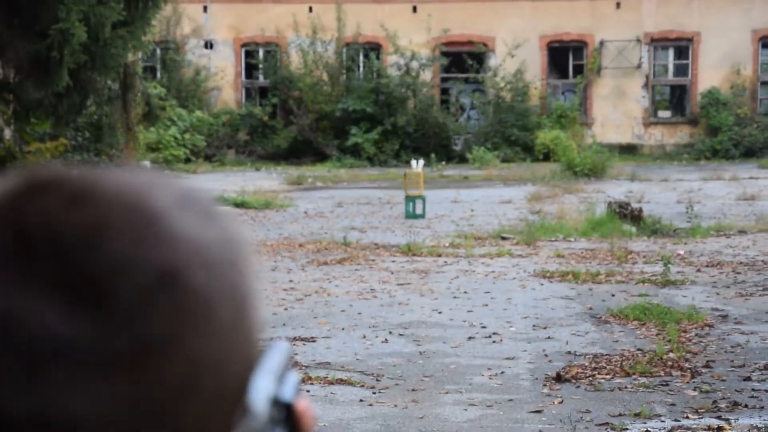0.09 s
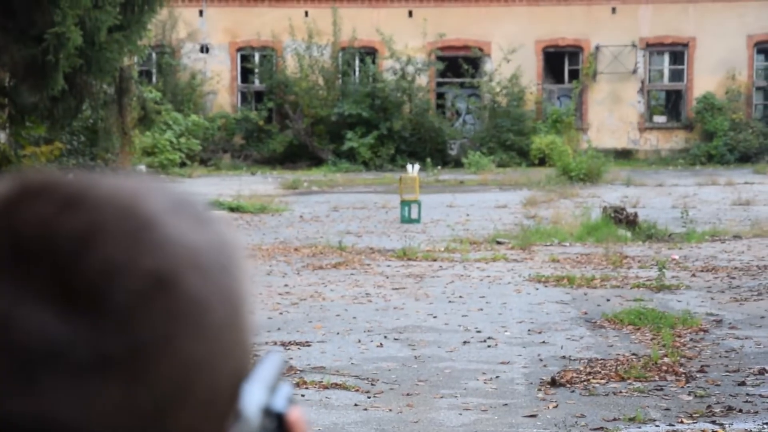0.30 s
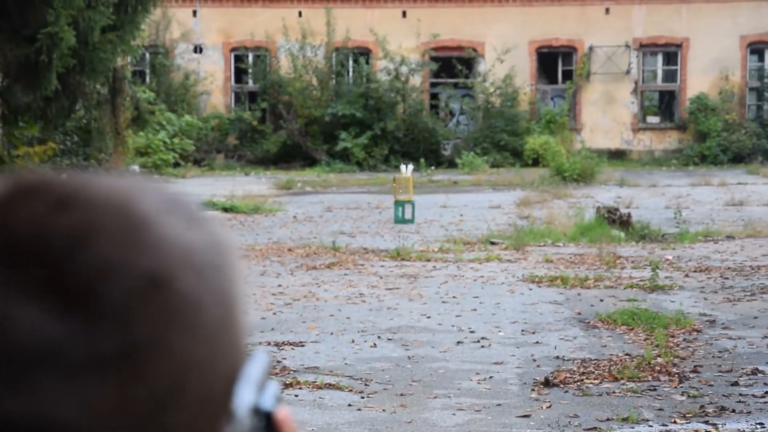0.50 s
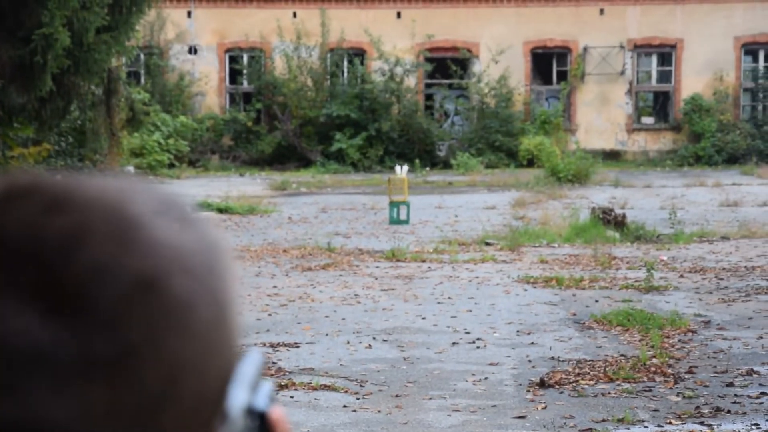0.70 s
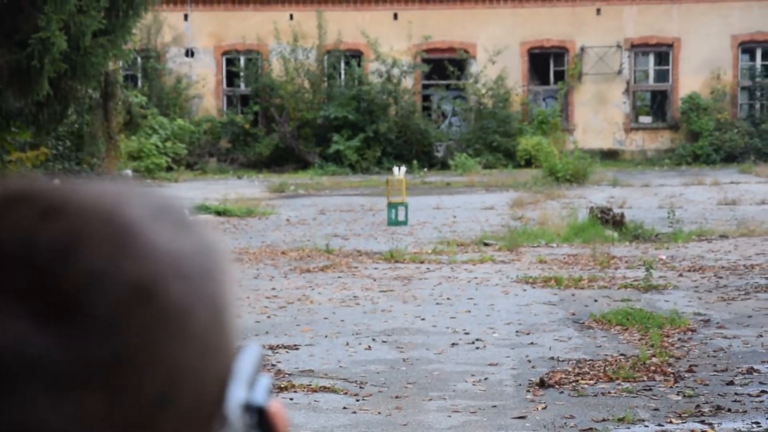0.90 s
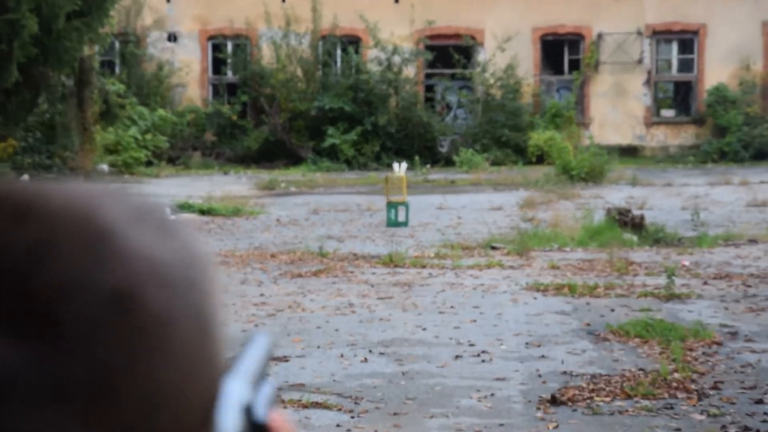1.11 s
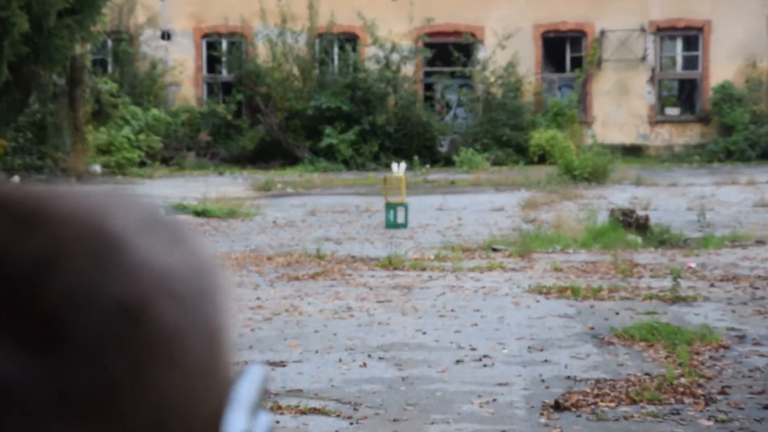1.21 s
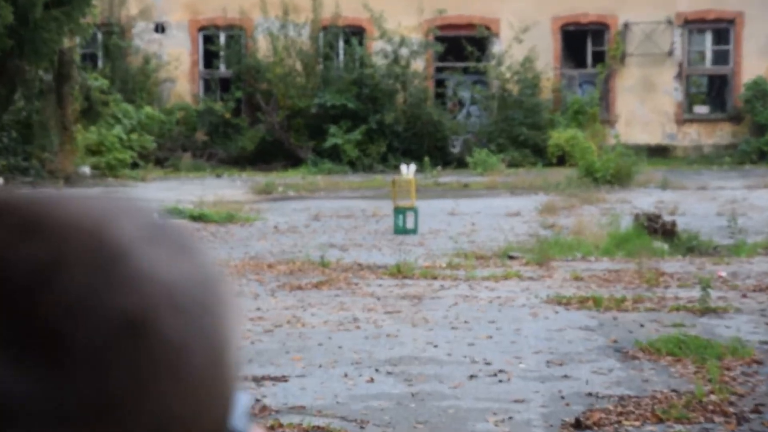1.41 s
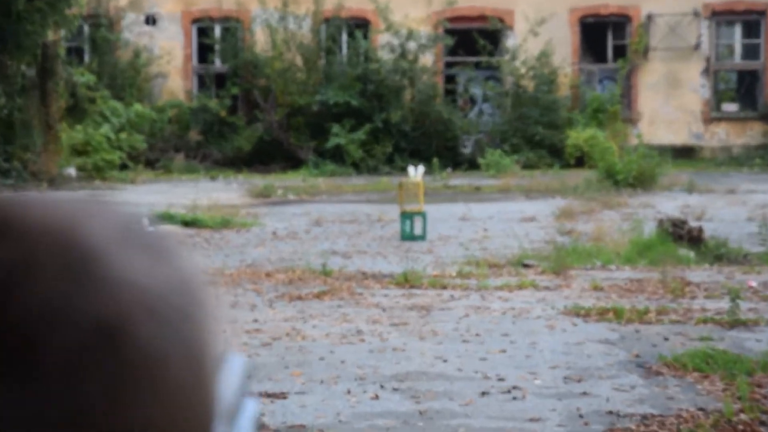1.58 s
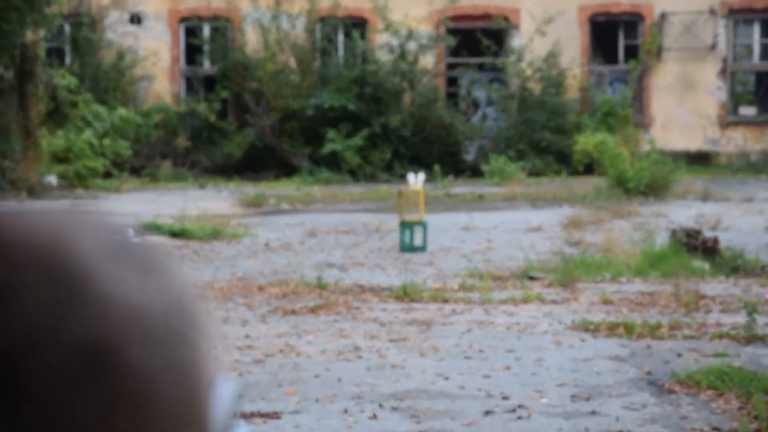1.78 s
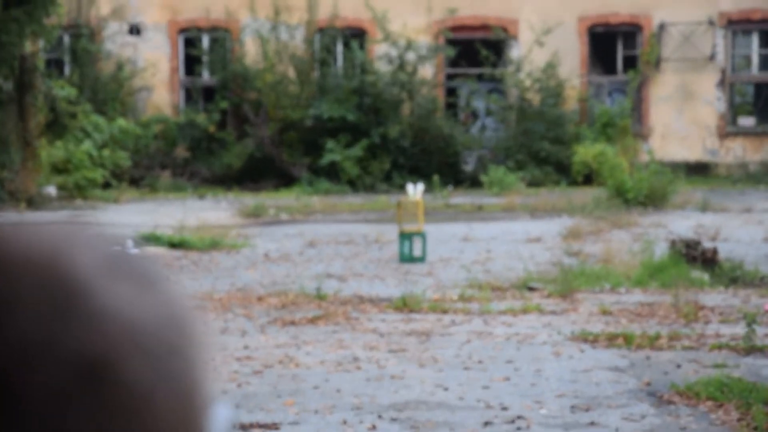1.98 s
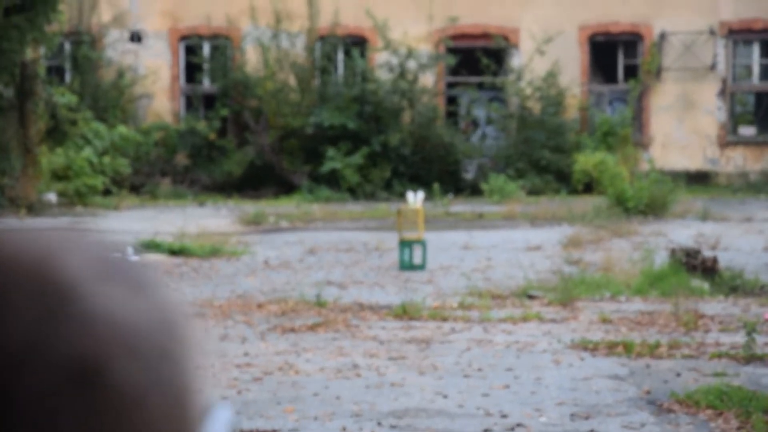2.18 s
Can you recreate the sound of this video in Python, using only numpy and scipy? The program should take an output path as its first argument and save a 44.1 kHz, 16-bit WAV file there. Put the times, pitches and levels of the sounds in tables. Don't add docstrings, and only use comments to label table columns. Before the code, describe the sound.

A spring-powered airsoft shotgun fires one sharp crack in a paved yard, then is pump-racked

```python
import sys
import numpy as np
from scipy import signal
from scipy.io import wavfile

SR = 44100
rng = np.random.default_rng(int(sys.argv[2]) if len(sys.argv) > 2 else 0)


def undo_db(level):
    steps = np.asarray(level, float) / 20
    return 10 ** steps


def output_pcm(signal):
    pcm = np.clip(np.atleast_2d(signal).T, -1, 1) * 32767
    wavfile.write(sys.argv[1], SR, np.round(pcm).astype(np.int16))


N = 97020

# frequency in Hz, level in dB.
HUSH_SPECTRUM = [(15, -40), (30, -19), (70, 2.5), (204, -5.5), (370, -7.5), (2430, -20), (3850, -30),
                 (4520, -23.5), (15600, -49.5)]
# frequency in Hz, level in dB.
HUM_TONES = [(200, -60), (300, -65.5)]
# frequency in Hz, width in Hz, level in dB, throb depth in dB.
INSECT_CHOIRS = [(4050, 1030, -60, 2), (3840, 250, -61.5, 6), (6400, 1400, -67, 3), (5440, 900, -67.5, 1.5)]
# frequency in Hz, level in dB per Hz.
EARLIER_SPECTRUM = [(200, 5), (500, 0), (900, 4), (1500, 0.5), (3000, -25), (8000, -37)]

# start in seconds, thump in dB, body in dB, metal in dB, dying time in seconds.
SHOT_CONTACTS = [
    (.1865, -12, -23.5, -24.5, 0.017),
    (.195, -11, -24, -17.5, 0.021),
    (.2027, -21, -14.5, -2.5, 0.0029),
    (.2057, 6, -1.5, 0.5, 0.0011),
    (.2095, -18, -6.5, -9, 0.0031),
    (.216, -11, -31, -20, 0.0093),
    (.229, -23, -20, -22.5, 0.018),
]
# frequency in Hz, width in Hz, level in dB.
THUMP_MODES = [(235, 30, -3), (375, 23, -16.5), (467, 120, -2.5), (660, 62, -5.5)]
# frequency in Hz, width in Hz, level in dB.
SHELL_MODES = [(860, 140, -1.5), (1177, 67, -1), (1447, 61, 0), (1625, 84, 0.5), (1940, 150, 0.5),
               (2446, 230, 1.5)]
# frequency in Hz, width in Hz, level in dB.
METAL_MODES = [(3080, 510, -4.5), (3750, 420, -2), (4190, 700, -1.5), (4970, 480, -4), (5445, 194, -2.5),
               (5700, 510, -2), (6260, 580, -1), (7080, 820, -2.5), (7670, 405, -4), (8370, 840, -8),
               (9380, 2700, -18), (12700, 2600, -48)]
# start in seconds, direction, frequency in Hz, width in Hz, level in dB.
BLAST_BLOWS = [
    (.2032, 1, 238, 45, 0),
    (.2043, 1, 540, 260, 1),
    (.2112, -1, 490, 190, 3),
    (.2028, 1, 1435, 70, -5),
    (.2028, 1, 1625, 60, -6),
    (.2046, 1, 650, 90, -9),
    (.2081, -1, 1435, 110, -9),
    (.2081, -1, 1625, 110, -10),
    (.2040, 1, 350, 90, -10),
]

# delay in seconds, level in dB, smear in seconds, dull above in Hz.
FACING_ECHOES = [
    (.098, -21, .004, 6000),
    (.100, -19, .035, 4500),
]
# delay in seconds, level in dB, smear in seconds, dull above in Hz.
WALL_ECHOES = [
    (0.148, -30.5, .015, 4030),
    (0.207, -37.5, .006, 3000),
    (.27, -34.5, .04, 400),
    (0.289, -37, 0.09, 3000),
    (0.435, -36.5, 0.12, 296),
    (.437, -33.5, 0.13, 3000),
]
# frequency in Hz, level in dB, 60 dB decay in seconds.
YARD_TAIL = [(101, -28, 0.19), (249, -20, 0.64), (550, -29.5, 0.89), (1030, -23.5, 0.98),
             (1640, -21.5, 1.55), (3000, -18, 1.05), (5900, -25.5, 0.86), (7940, -12, 0.55),
             (11900, -28, 0.56)]
# start in seconds, frequency in Hz, width in Hz, level in dB.
BOOM_RETURNS = [
    (.235, 244, 4.0, -23),
    (.40, 256, 9, -33),
    (.475, 240, 7, -33),
    (.51, 250, 12, -35),
    (.635, 237, 6, -33),
    (.665, 237, 9, -34),
]

# start in seconds, frequency in Hz, width in Hz, level in dB.
TAP_BLOWS = [(0.8634, 1060, 200, -31.5), (.921, 820, 196, -24), (0.9207, 4150, 260, -12.5),
             (.9212, 5840, 348, -15.5), (0.9215, 3710, 250, -15.5), (0.942, 7000, 900, -46),
             (0.9896, 6800, 500, -19), (0.9966, 5740, 300, -26), (1.0382, 6500, 300, -18),
             (1.0445, 6800, 400, -21), (1.282, 7000, 400, -29), (1.305, 7200, 298, -30),
             (1.307, 2280, 200, -30), (1.3314, 2450, 300, -19), (1.3315, 3450, 400, -16),
             (0.9768, 4560, 300, -22), (0.9896, 810, 200, -20), (1.0133, 6250, 120, -19),
             (1.0185, 763, 152, -16), (1.037, 365, 60, -35), (1.0375, 780, 103, -24),
             (1.0392, 1620, 204, -10.5), (1.048, 4850, 300, -18), (1.2806, 1720, 199, -24),
             (1.2905, 715, 152, -29), (1.3315, 870, 300, -26), (1.3305, 1500, 300, -27),
             (1.363, 1190, 121, -16.5), (1.3645, 1570, 202, -10), (1.366, 260, 79, -21.5),
             (1.367, 755, 120, -19), (1.375, 6400, 200, -22), (1.7339, 400, 120, -30),
             (1.7482, 2780, 250, -37), (1.7475, 3770, 500, -34.5), (1.748, 131, 60, -28),
             (1.7495, 670, 122, -36.5)]
# start in seconds, thump, body and metal in dB, dying time in seconds.
PUMP_CONTACTS = [(.864, -38, -41.5, -48, 0.0082), (.941, -58, -32.5, -61, 0.0077),
                 (.958, -48, -33, -48, 0.011), (.9755, -53, -24, -23, 0.002),
                 (.982, -54, -25.5, -34, 0.0096), (.989, -43, -20.5, -17, 0.0042),
                 (.995, -52, -33.5, -31.5, 0.017), (1.009, -59, -25, -24.5, 0.011),
                 (1.018, -34, -23, -24.5, 0.0094), (1.035, -21, -14.5, -17, 0.0031),
                 (1.0378, -16, -18, -15, 0.0045), (1.0435, -33, -31.5, -29, 0.029)]
# start in seconds, thump, body and metal in dB, dying time in seconds.
PUSH_CONTACTS = [(1.192, -39.5, -34, -40, 0.014), (1.247, -61, -46, -64, 0.0036),
                 (1.2799, -53, -39.5, -31, 0.011), (1.29, -61, -30.5, -36, 0.0068),
                 (1.302, -43, -31.5, -30, 0.021), (1.3314, -41, -15.5, -20, 0.0014),
                 (1.338, -42, -30.5, -35.5, 0.021), (1.3575, -45, -26.5, -23.5, 0.0085),
                 (1.365, -17, -12, -17, 0.0021), (1.3680, -44, -14, -12, 0.0055),
                 (1.374, -32.5, -31.5, -32, 0.034), (1.732, -42, -45, -62, 0.009),
                 (1.749, -39, -36, -73, 0.004)]
# frequency in Hz, width in Hz, level in dB.
KNOCK_MODES = [(155, 89, -6), (228, 86, -5.5), (394, 110, -0.5)]
# frequency in Hz, width in Hz, level in dB.
BODY_MODES = [(583, 89, -3), (705, 215, 1.5), (900, 175, 1.5), (1097, 205, -0.5), (1500, 266, 2),
              (1840, 390, 0), (2250, 470, 0), (2780, 180, -3)]
# start in seconds, thump, body and metal in dB, dying time in seconds.
CATCH_CONTACTS = [
    (.918, -23, -37, -37, 0.0025),
    (.9211, -19, -20.5, -17, 0.0014),
    (.925, -35, -30, -26, 0.0018),
    (1.7472, -63, -37, -37.5, 0.0011),
]
# frequency in Hz, width in Hz, level in dB.
LATCH_MODES = [(2670, 300, -20), (3270, 230, -5), (3710, 220, -0.5), (4150, 240, 5), (5090, 300, -7),
               (5840, 350, -6), (7450, 900, -8)]
# start in seconds, thump, body and metal in dB, dying time in seconds.
TRIGGER_CONTACTS = [
    (2.1797, -63, -60, -31, 0.0054),
    (2.186, -63, -54, -44, 0.0079),
    (2.192, -50, -47.5, -35.5, 0.012),
    (2.198, -57, -45, -28, 0.005),
]
# frequency in Hz, width in Hz, level in dB.
TRIGGER_MODES = [(3000, 240, -25), (3670, 280, 6.5), (3980, 180, 5), (5300, 350, -4.5), (6300, 500, -7),
                 (7200, 410, -7.5), (8440, 710, -15), (10900, 2800, -24)]

HUSH_DB, WHINE_HZ, WHINE_DB, THROBS_PER_S = -54, 15720, -75, 50
EARLIER_DB, EARLIER_T60_S = -51.5, 12.2
SPRING_HZ, SPRING_BEFORE_DB, SPRING_DB = 560, -54.5, -42.5
SPRING_T60_S, SPRING_GRIPPED_S = 3.24, 1
CHATTER_PER_S, CHATTER_SPREAD_DB, MODE_SPREAD_DB = 7000, 4.0, 2.0
FIRST_TOUCH, RISE_SHARE = 2.0, 0.3
BLAST_DB = 0
YARD_LUMPS_DB, YARD_RISE_S = 2.0, 0.0059
FACING_LOW_HZ, WALL_LOW_HZ = 480, 20
LATCH_CUT_HZ, GUN_LOW_CUT_HZ = 16000, 150
CATCH_TO_YARD = 0.4
MIC_HISS_DB, CLIP_TOP, CLIP_HARD = -74, 0.97, 6


def rms_one(x):
    return x / np.sqrt(np.mean(x ** 2) + 1e-20)


def drift(rate_hz):
    r = np.exp(-2 * np.pi * rate_hz / SR)
    slow = signal.lfilter([1], [1, -2 * r, r * r], rng.standard_normal(N + SR))
    return rms_one(slow[SR:])


def resonate(x, hz, width_hz):
    r = np.exp(-np.pi * width_hz / SR)
    w = 2 * np.pi * hz / SR
    return signal.lfilter([0, np.sin(w)], [1, -2 * r * np.cos(w), r * r], x + 1e-18)


def bands():
    edges = 24 * 2 ** np.arange(0, 9.6, 0.5)
    white = rng.standard_normal((2, N))
    for k, (low, high) in enumerate(zip(edges, edges[1:])):
        band = signal.butter(2, [low, high], "band", fs=SR, output="sos")
        yield np.sqrt(low * high), signal.sosfilt(band, white[k % 2])


def at_hz(points, hz, axis=1):
    table = np.array(points)
    return np.interp(np.log(hz), np.log(table[:, 0]), table[:, axis])


def throb():
    rate_hz = THROBS_PER_S * (1 + 0.239 * drift(6.44))
    return np.sin(2 * np.pi * np.cumsum(rate_hz) / SR)


def insects():
    out = np.zeros(N)
    for hz, width_hz, db, depth_db in INSECT_CHOIRS:
        level = undo_db(db + depth_db * throb())
        song = resonate(resonate(rng.standard_normal(N), hz, width_hz), hz, width_hz)
        out += level * rms_one(song)
    return out


def background():
    t = np.arange(N) / SR
    hush = sum(b * undo_db(at_hz(HUSH_SPECTRUM, hz) + 0.5 * drift(3)) for hz, b in bands())
    hush = rms_one(hush) * undo_db(HUSH_DB - 0.5)
    hum = sum(undo_db(db + 2.5 + 3.9 * drift(11)) * np.sin(2 * np.pi * hz * t) for hz, db in HUM_TONES)
    earlier = rms_one(sum(b * undo_db(at_hz(EARLIER_SPECTRUM, hz)) for hz, b in bands()))
    earlier = earlier * undo_db(EARLIER_DB - 60 * t / EARLIER_T60_S)
    whine = undo_db(WHINE_DB + 3 * drift(30)) * np.sin(2 * np.pi * WHINE_HZ * t)
    return hush + hum + insects() + earlier + whine


def spring():
    t = np.arange(N) / SR
    since_s = t - SHOT_CONTACTS[2][0]
    level_db = np.where(since_s < 0, SPRING_BEFORE_DB, SPRING_DB - 60 * since_s / SPRING_T60_S)
    held = np.clip((SPRING_GRIPPED_S - t) / 0.019, 0, 1)
    hz = SPRING_HZ + 5.7 * drift(3.9)
    return held * undo_db(level_db + 3.5 * drift(31)) * np.sin(2 * np.pi * np.cumsum(hz) / SR)


def chatter_bursts(rows):
    t = np.arange(2048) / SR
    shape = (len(rows), len(t))
    spread_db = CHATTER_SPREAD_DB * np.minimum(rng.exponential(1, shape), 3)
    impacts = undo_db(spread_db) * rng.choice([-1, 1], shape)
    impacts = impacts * (rng.random(shape) < CHATTER_PER_S / SR)
    impacts[:, 0] = FIRST_TOUCH
    bursts = []
    for row, hits in zip(rows, impacts):
        dying_s = row[4]
        rise = np.minimum(0.32 + t / (RISE_SHARE * dying_s), 1)
        burst = hits * np.exp(-t / dying_s) * rise
        bursts.append(burst / np.linalg.norm(burst))
    return bursts


def contacts(rows, parts):
    out = np.zeros(N)
    bursts = chatter_bursts(rows)
    for column, part in enumerate(parts, start=1):
        for k, (hz, width_hz, db) in enumerate(part):
            force = np.zeros(N + 2048)
            luck = rng.standard_normal(len(rows))
            for row, burst, own in zip(rows, bursts, luck):
                i = int(row[0] * SR)
                level = undo_db(row[column] + db - 0.5 + MODE_SPREAD_DB * own)
                force[i:i + len(burst)] += burst * np.sqrt(row[4] * width_hz) * level
            out += (-1) ** k * resonate(force[:N], hz, width_hz)
    return out


def blow(start_s, hz, width_hz, db):
    kick = np.zeros(N)
    kick[int(start_s * SR)] = undo_db(db)
    return resonate(kick, hz, width_hz)


def blast():
    return undo_db(BLAST_DB) * sum(direction * blow(start_s, hz, width_hz, db)
                               for start_s, direction, hz, width_hz, db in BLAST_BLOWS)


def wall_echo(delay_s, db, smear_s, low_hz, high_hz):
    t = np.arange(N) / SR
    late_s = np.maximum(t - delay_s, 0)
    puff = rng.standard_normal(N) * (t > delay_s) * np.exp(-late_s / smear_s)
    puff = puff / np.sqrt(smear_s * SR / 2)
    b, a = signal.butter(1, [low_hz, high_hz], "band", fs=SR)
    return undo_db(db) * signal.lfilter(b, a, puff)


def yard(x):
    t = np.arange(N) / SR
    lumps = undo_db(YARD_LUMPS_DB * drift(48.0)) * (1 - np.exp(-t / YARD_RISE_S))
    reply = np.zeros(N)
    for hz, band in bands():
        level_db = at_hz(YARD_TAIL, hz) - 60 * t / at_hz(YARD_TAIL, hz, axis=2)
        reply += band * undo_db(level_db)
    reply *= lumps / 20
    for walls, low_hz in ((FACING_ECHOES, FACING_LOW_HZ), (WALL_ECHOES, WALL_LOW_HZ)):
        for delay_s, db, smear_s, high_hz in walls:
            reply += wall_echo(delay_s, db, smear_s, low_hz, high_hz)
    return signal.fftconvolve(x, reply)[:N]


def booms():
    return sum(blow(*boom) for boom in BOOM_RETURNS)


def taps():
    return sum(blow(*tap) for tap in TAP_BLOWS)


def release_catch():
    snap = contacts(CATCH_CONTACTS, [KNOCK_MODES, BODY_MODES, LATCH_MODES])
    return signal.sosfilt(signal.butter(4, LATCH_CUT_HZ, fs=SR, output="sos"), snap)


def scene():
    low_cut = signal.butter(4, GUN_LOW_CUT_HZ, "high", fs=SR, output="sos")
    shot = blast() + contacts(SHOT_CONTACTS, [THUMP_MODES, SHELL_MODES, METAL_MODES])
    pump = contacts(PUMP_CONTACTS + PUSH_CONTACTS, [KNOCK_MODES, BODY_MODES, METAL_MODES])
    trigger = contacts(TRIGGER_CONTACTS, [KNOCK_MODES, BODY_MODES, TRIGGER_MODES])
    gun = signal.sosfilt(low_cut, shot + pump + taps() + trigger)
    catch = signal.sosfilt(low_cut, release_catch())
    returns = signal.sosfilt(low_cut, booms())
    mix = background() + spring() + gun + catch + returns + yard(gun + CATCH_TO_YARD * catch)
    return mix[None]


def low_pass(x):
    return signal.sosfilt(signal.butter(12, 15800, fs=SR, output="sos"), x)


def record(dry):
    x = dry + undo_db(MIC_HISS_DB) * rng.standard_normal(dry.shape)
    mix = x / (1 + np.abs(x / CLIP_TOP) ** CLIP_HARD) ** (1 / CLIP_HARD)
    return low_pass(mix)


dry = scene()
out = record(dry)
output_pcm(out)
```